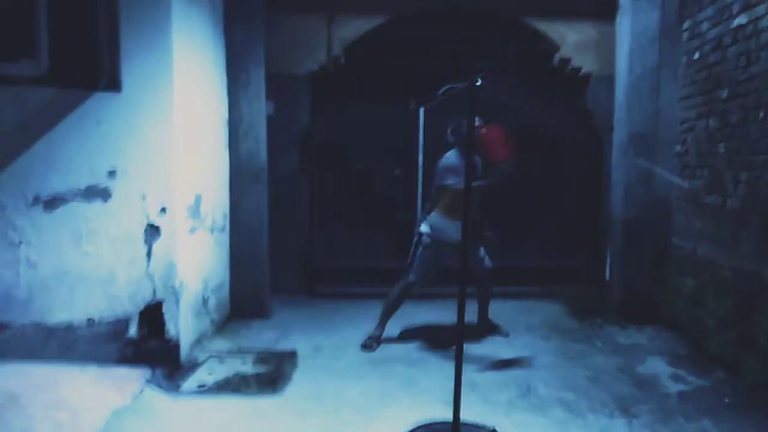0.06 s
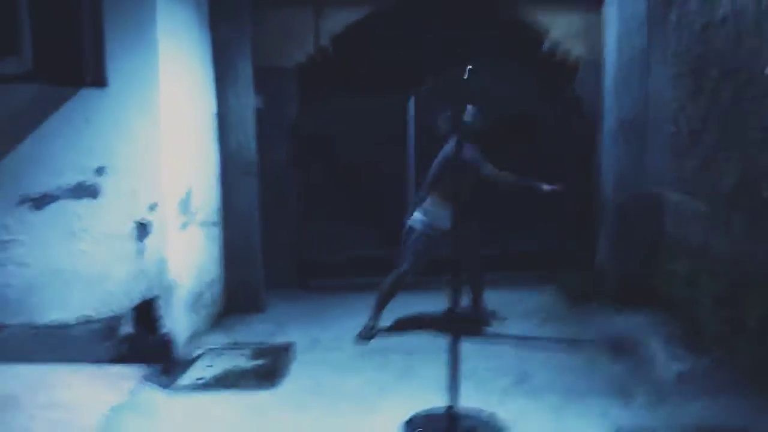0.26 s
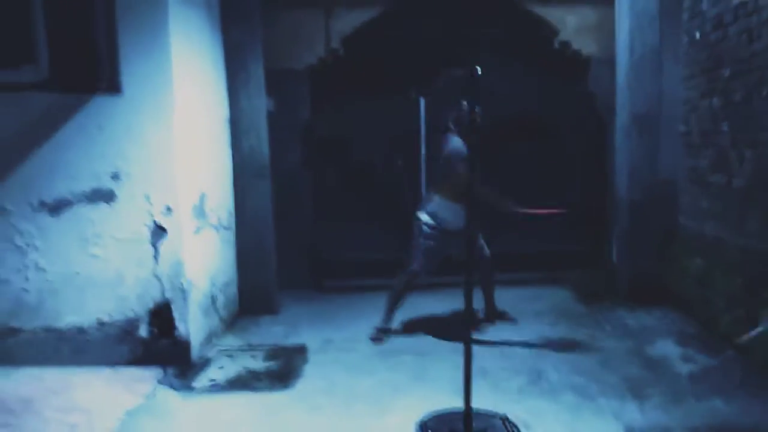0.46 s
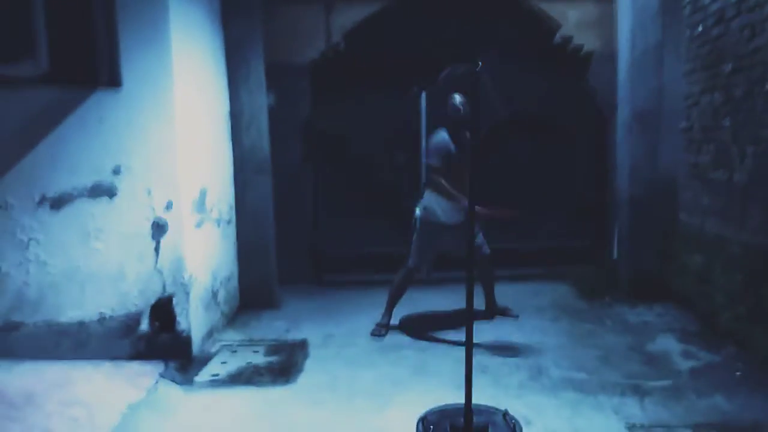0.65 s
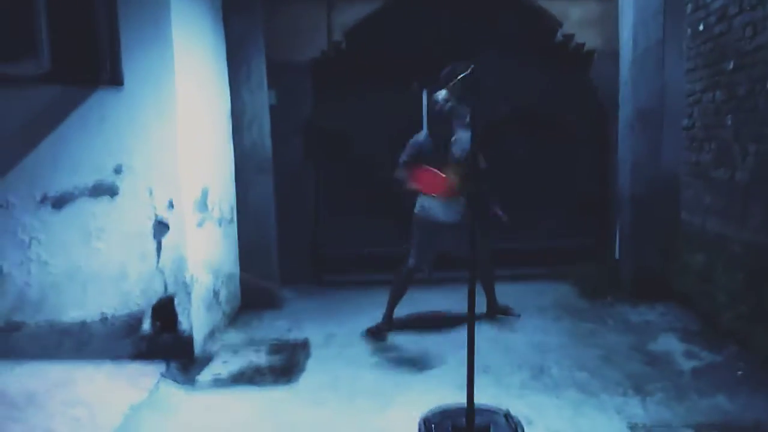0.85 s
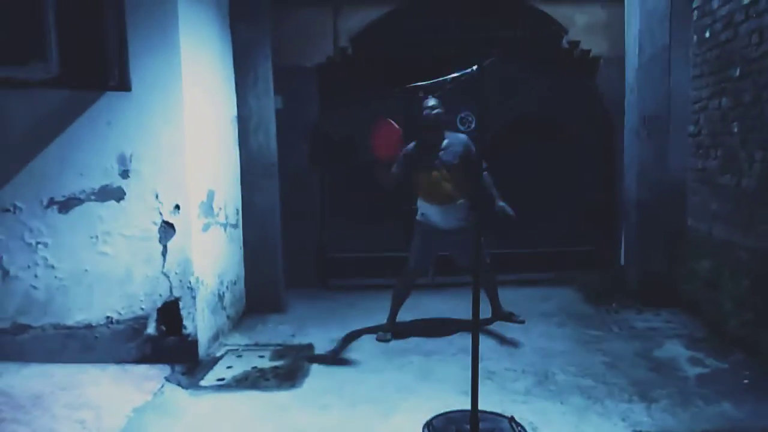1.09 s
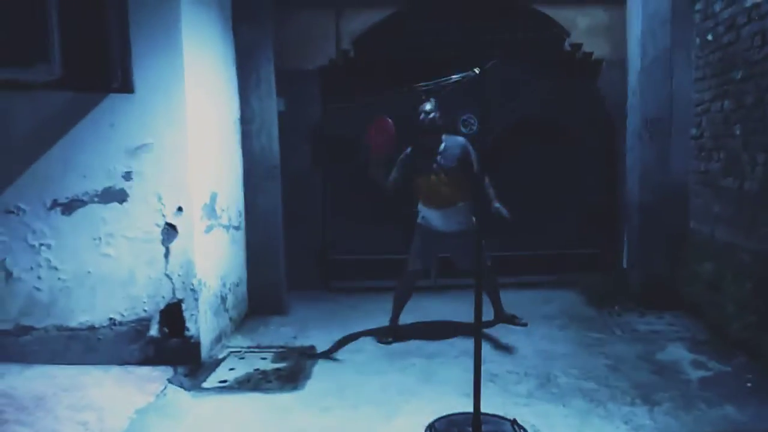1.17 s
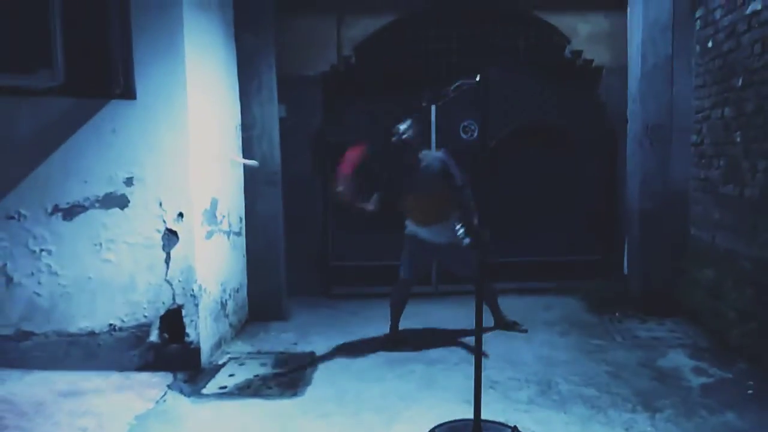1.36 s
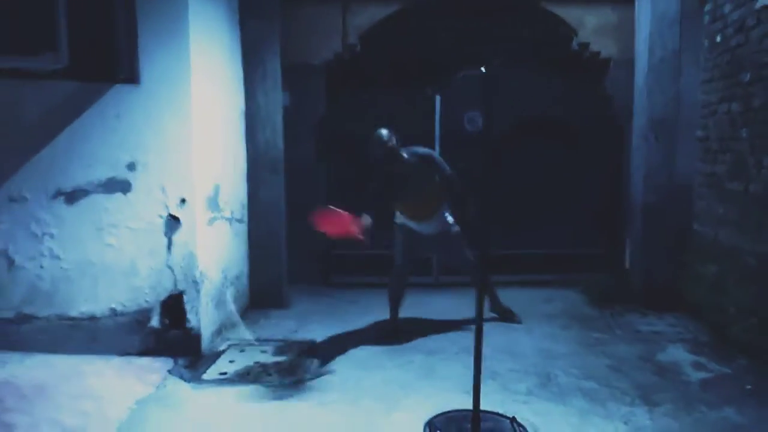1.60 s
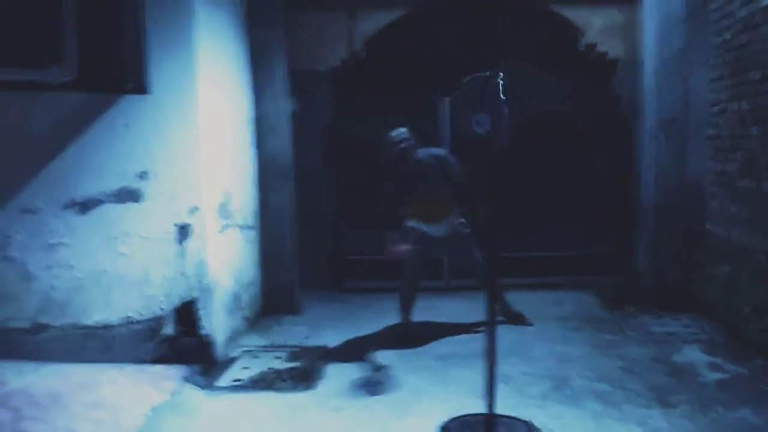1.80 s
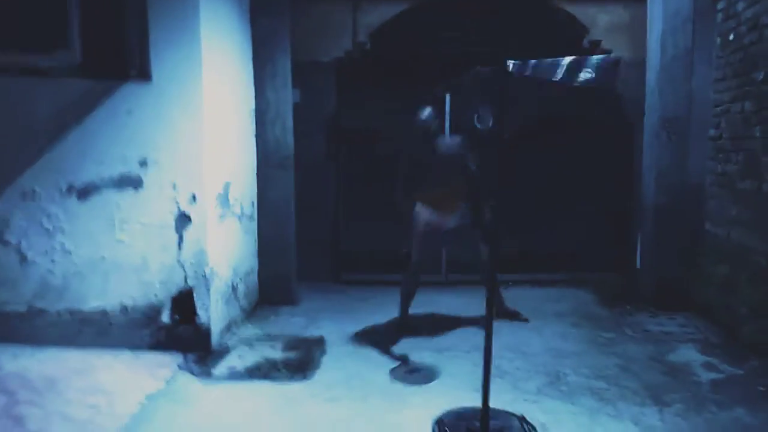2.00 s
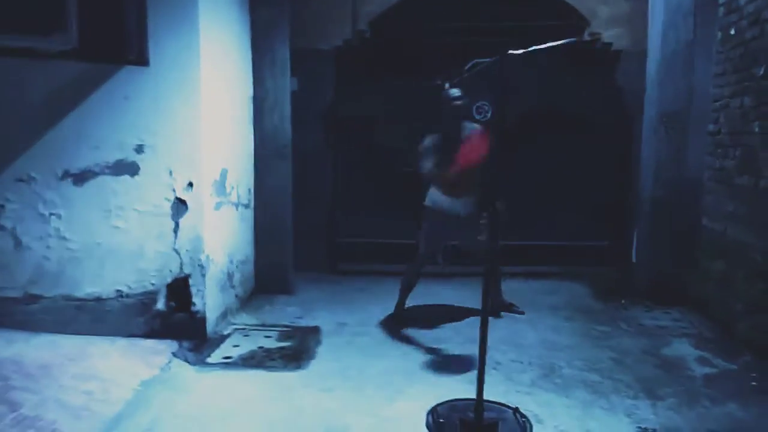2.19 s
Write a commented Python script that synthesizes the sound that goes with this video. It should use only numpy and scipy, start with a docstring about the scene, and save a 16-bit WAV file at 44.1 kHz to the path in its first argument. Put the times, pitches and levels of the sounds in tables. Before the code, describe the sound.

A paddle smashes a tethered ball with a booming thump, then hits it again with a brighter knock. The cord faintly swishes and squeaks, and an insect chirps rapidly throughout in a walled yard at night.

```python
"""Night in a walled yard: over low air, an insect rubs its wings in about twelve chirps a second.
A tether squeaks; at 0.22 s a paddle smashes the ball, the walls boom, and a thin tick follows.
The cord swishes and squeaks. At 1.44 s the right microphone, muffled throughout, takes a soft bump.
At 1.54 s comes a second, brighter knock, then more swish and squeak from the cord."""
import sys
import numpy as np
from scipy import signal
from scipy.fft import rfft, irfft
from scipy.io import wavfile

SR = 44100
rng = np.random.default_rng(int(sys.argv[2]) if len(sys.argv) > 2 else 0)


def output_pcm(signal):
    """Save a mono or channel-first signal as 16-bit PCM at the path in sys.argv[1].

    Samples are clipped to [-1, 1] before scaling.
    """
    pcm = np.clip(np.atleast_2d(signal).T, -1, 1) * 32767
    wavfile.write(sys.argv[1], SR, np.round(pcm).astype(np.int16))


N = 99225

# paddle blows: start_s, yard_db, build_s, hold_s, t60_scale, crack_db
BLOWS = [(.223, -18, 0.003, 0.066, 1.0, -25.5), (1.544, -21.5, .008, 0.019, 0.74, -23)]


def undb(db):
    """Decibels to gain."""
    return 10 ** (np.asarray(db) / 20)


def curve(points, hz):
    """Read (freq_hz, value) points on a log-frequency axis."""
    p = np.array(points, float)
    return np.interp(np.log(np.maximum(hz, 1)), np.log(p[:, 0]), p[:, 1])


def colour(x, points):
    """Filter by a (freq_hz, gain_db) curve."""
    size = 2 * N
    return irfft(rfft(x, size) * undb(curve(points, np.arange(N + 1) * SR / size)))[:N]


def noise(points):
    """Coloured noise, rms 1."""
    x = colour(rng.standard_normal(N), points)
    return x / x.std()


def swell(t, half_s):
    """Flat-topped burst centred on t = 0."""
    return np.exp(-np.square(np.square(t / half_s)))


def rise(t, length_s):
    """Linear onset from t = 0."""
    return np.clip(t / length_s, 0, 1)


def fade(t, t60_s):
    """Exponential decay from t = 0."""
    return np.exp(-np.log(1000) * np.maximum(t, 0) / t60_s)


def late_drop(t, knee_s=.3, db_per_s=105):
    """Extra decay past the knee."""
    return undb(-db_per_s * np.maximum(t - knee_s, 0))


def waver(t):
    """Slow random wobble, unit-variance knots."""
    knots_s = np.arange(0, 3, .02)
    return np.interp(t, knots_s, rng.standard_normal(len(knots_s)))


def scatter(x, t, t60_s):
    """Diffuse reflections: convolution with decaying noise of unit energy."""
    paths = rng.standard_normal(N) * fade(t, t60_s)
    return signal.fftconvolve(x, paths / np.linalg.norm(paths))[:N]


def night_air():
    """Steady low hush."""
    # air spectrum: freq_hz, density_db
    hush = [(60, -19), (170, -4), (290, 3), (550, -14.5), (900, -16.5), (2000, -22.5), (5000, -23),
            (9000, -26.5), (16000, -33)]
    return undb(-65.5) * noise(hush)


def night_rumble():
    """Left and right air rumble, mostly common to both."""
    # rumble spectrum: freq_hz, density_db
    rumble = [(20, -4.5), (50, -1), (100, 7.5), (170, -12), (300, -22), (700, -51.5), (2000, -37),
              (16000, -55)]
    common = noise(rumble)
    return [undb(-65.5) * (.85 * common + .5 * noise(rumble)) for _ in range(2)]


def insect(t):
    """Wings open softly and close loudly, each stroke sagging in pitch; the walls echo."""
    # chirps: centre_s, gain_db
    chirps = [(0.0306, 0.5), (0.1111, -3), (.1935, 0), (0.3484, -8), (0.4347, -1), (0.5227, -1), (.6095, 0),
              (.694, -1.5), (0.7787, 1), (0.8645, 0), (0.9454, -1), (1.0285, 3), (1.1105, 1.5), (1.1926, 2),
              (1.2735, 1.5), (1.3535, 0), (1.4333, 0), (1.5158, 0.5), (1.5972, -0.5), (1.684, -2),
              (1.7646, -0.5), (1.8471, 1), (1.9259, 0.5), (2.0115, -1), (2.0978, 0.5), (2.1812, 0.5),
              (2.266, 3)]
    # wing partials: pitch_hz, gain_db
    partials = [(571, -22), (1938, -32.5), (3327, -15.5), (4457, -26.5), (5803, -32.5), (7214, 0),
                (8333, -26.5), (9679, -32.5), (11100, -18), (12231, -28), (13566, -31), (14416, -26.5),
                (14987, -21.5)]
    # wall echoes: delay_s, gain_db
    echoes = [(.0065, -12), (.014, -17.5), (.0235, -13), (.033, -24.5)]
    # opening-wing scrape spectrum: freq_hz, density_db
    scrape_spectrum = [(7000, -33), (9000, -38.5), (9900, 11), (12000, -29.5), (13000, -30.5), (13700, 17),
                       (14600, -23), (15600, -9)]
    half_s, open_lead_s, scrape_lead_s = .0039, .016, .018
    open_sag_hz_per_s, close_sag_hz_per_s = 45000, 30000
    wings, close_env, open_env, scrape_env = np.zeros((4, N))
    for (at_s, db), draw in zip(chirps, rng.standard_normal((len(chirps), 4))):
        detune_hz, width_s = 25 * draw[0], half_s * (1 + .14 * draw[1])
        opening = (-open_lead_s + .0015 * draw[2], -17.5 + 1.5 * draw[3], open_sag_hz_per_s)
        parts = [(0, 0, close_sag_hz_per_s), opening]
        parts += [(s, g + 2.5 * rng.standard_normal(), close_sag_hz_per_s) for s, g in echoes]
        for delay_s, part_db, sag in parts:
            near = abs(t - at_s - delay_s) < 2 * half_s
            u = t[near] - at_s - delay_s
            slip = .6 * np.cumsum(rng.standard_normal(len(u))) / SR ** .5  # uneven teeth
            bend_cycles = detune_hz * u - sag * u * u / 2 + slip
            tone = sum(undb(g) * np.sin(2 * np.pi * (hz * u + bend_cycles + rng.random()))
                       for hz, g in partials)
            wings[near] += undb(db + part_db) * swell(u, width_s) * tone
        close_env += undb(db) * swell(t - at_s, half_s)
        open_env += undb(db) * swell(t - at_s + open_lead_s, half_s)
        scrape_env += undb(db) * swell(t - at_s + scrape_lead_s, half_s=.011)
    close_rasp = undb(-29.5) * close_env * rng.standard_normal(N)
    open_rasp = undb(-25) * open_env * noise([(6200, -32), (7200, -2), (8300, -39)])
    wings += close_rasp + open_rasp
    tail = undb(-15) * scatter(wings, t, t60_s=.21)
    return undb(-32.5) * (wings + tail) + undb(-64) * scrape_env * noise(scrape_spectrum)


def cord(t):
    """The cord squeaks faintly on the pole and hisses through the air."""
    # squeaks: centre_s, half_s, pitch_hz, level_db
    squeaks = [(0.045, 0.0468, 2850, -67.5), (1.3, 0.014, 2100, -65), (1.81, .025, 2590, -62.5),
               (1.865, 0.026, 2530, -61.5), (1.843, 0.063, 3020, -65.5)]
    # swishes: centre_s, half_s, level_db
    swishes = [(0.983, 0.0467, -51.5), (1.773, 0.12, -53)]
    # swish spectrum: freq_hz, density_db
    swish_spectrum = [(300, -23), (1500, -11), (3000, -13.5), (5500, -4), (7000, -7.5), (9000, 5.5),
                      (12000, -2), (14500, 1.5), (16000, -22)]
    out = noise(swish_spectrum) * sum(undb(db) * swell(t - at_s, half_s) for at_s, half_s, db in swishes)
    for at_s, half_s, hz, db in squeaks:
        envelope = undb(db + 3.2 * waver(t)) * swell(t - at_s, half_s)
        out += envelope * noise([(hz * .795, -60), (hz, 0), (hz * 1.107, -60)])
    return out


def paddle_ring(age_s):
    """Struck paddle modes, wavering in level and phase."""
    # paddle modes: pitch_hz, gain_db, base_t60_s
    modes = [(354.8, -12, 0.71), (511, -14.5, 0.28), (670, -10.5, 0.33), (761.8, -0.5, .25),
             (987, -14.5, 0.28), (1145, -2.5, 0.61), (1234, -3, 0.25), (1283, -1, .58), (1388, -6.5, .42),
             (1795, -20, 0.3), (2020, -16, 0.36), (2580, -17, 0.43)]
    ring = 0
    for hz, db, t60_s in modes:
        envelope = undb(db) * fade(age_s, t60_s) * (1 + .3 * waver(age_s - age_s[0]))
        phase = 2 * np.pi * (hz * age_s + rng.random()) + .6 * waver(age_s - age_s[0])
        ring += envelope * np.sin(phase)
    return undb(-27.5) * ring * rise(age_s, .0064) * late_drop(age_s)


def yard(age_s, spectrum, build_s, hold_s, t60_scale):
    """Dense reflections build, hold, then die by octave band; the treble holds least."""
    # yard ring time: freq_hz, base_t60_s
    ring_times = [(50, 1), (130, 0.8146), (300, 0.51), (700, 0.45), (1250, 0.51), (3000, 0.62),
                  (9000, 0.54), (15000, 0.45)]
    bins, hz = rfft(noise(spectrum)), np.arange(N // 2 + 1) * SR / N
    octave = np.clip(np.log2(np.maximum(hz, 1) / 32), 0, 9)
    out = 0
    for k in range(10):
        centre_hz = 32 * 2 ** k
        band = irfft(bins * np.maximum(1 - abs(octave - k), 0), N)
        onset = rise(age_s, build_s + 3.3 / centre_hz) ** (2 if k < 4 else 1)
        decay = fade(age_s - hold_s / (1 + centre_hz / 3500), t60_scale * curve(ring_times, centre_hz))
        out += band * onset * decay * (late_drop(age_s) if k > 2 else 1)
    return out


def blows(t):
    """Each blow rings the paddle, cracks and fills the yard."""
    # smash spectrum in the yard: freq_hz, density_db
    smash = [(25, -14), (60, -8), (105, -5), (160, -3.5), (250, -6), (500, -9.5), (800, -11.5), (1220, -11),
             (1700, -18), (3000, -25.5), (5500, -28), (7000, -29), (8300, -26), (12000, -34.5),
             (16000, -44)]
    # knock spectrum in the yard: freq_hz, density_db
    knock = [(40, -30), (100, -13.5), (170, -5), (250, -5), (370, -0.5), (640, -3.5), (860, -8.5),
             (1200, 5), (1650, -10), (3000, -20), (5500, -23), (8500, -18), (12000, -26.5), (16000, -33.5)]
    # crack spectrum: freq_hz, density_db
    crack_spectrum = [(200, -12.5), (1200, 13), (2500, 0), (6000, -10.5), (8500, -3), (16000, -20)]
    out = 0
    for (at_s, yard_db, build_s, hold_s, t60_scale, crack_db), spectrum in zip(BLOWS, (smash, knock)):
        age_s = t - at_s
        out += paddle_ring(age_s)
        crack = noise(crack_spectrum) * rise(age_s, .003) * np.exp(-np.maximum(age_s, 0) / .02)
        out += undb(crack_db) * crack
        out += undb(yard_db) * yard(age_s, spectrum, build_s, hold_s, t60_scale)
    return out


def wall_slaps(t):
    """The walls return each blow as short, sharp pulses."""
    # slaps: centre_s, level_db, pitch_hz, half_s
    slaps = [(.229, -17, 1252, .002), (.2345, -20, 1200, 0.007), (0.233, -19, 400, .006),
             (.243, -17.5, 1200, 0.0027), (.251, -8, 520, 0.003), (.2555, -12.5, 165, 0.0072),
             (.296, -19.5, 330, 0.011), (.305, -18.5, 175, 0.01), (.345, -26, 149, 0.0044),
             (1.548, -23.5, 486, .007), (1.55, -29, 1150, 0.0085), (1.5635, -9, 1200, 0.0012),
             (1.571, -17, 1231, 0.012), (1.587, -20.5, 1220, 0.0035)]
    return sum(undb(db) * np.exp(-np.square((t - at_s) / half_s)) * np.sin(2 * np.pi * hz * (t - at_s))
               for at_s, db, hz, half_s in slaps)


def boom(t, lag_s=.022):
    """Low standing waves between the walls, raised by the smash."""
    # standing waves: pitch_hz, level_db, base_t60_s
    modes = [(124, -30.5, 0.97), (166.7, -23.5, .6), (203.1, -38.5, .75)]
    age_s = t - BLOWS[0][0] - lag_s
    waves = sum(undb(db) * fade(age_s, t60_s) * np.sin(2 * np.pi * (hz * age_s + rng.random()))
                for hz, db, t60_s in modes)
    return waves * rise(age_s, .0092) * late_drop(age_s, knee_s=.43)


def tick(t, start_s=.4071):
    """A thin, high tick rings briefly in the yard."""
    # tick spectrum: freq_hz, density_db
    spectrum = [(3000, -30), (7000, -16.5), (8500, 9.5), (12000, -1), (16000, -7)]
    return undb(-40) * noise(spectrum) * fade(t - start_s, t60_s=.239) * (t > start_s)


def bump(t):
    """A dull push on the microphone, then a short rumble."""
    # pushes: centre_s, gain_db, pitch_hz
    pushes = [(1.4384, -28.5, 107.8), (1.4509, -15.5, 95.2)]
    # push filter: freq_hz, gain_db
    body = [(100, -1), (400, 10), (900, 4.5), (1400, -10), (3000, -50.5)]
    # rumble spectrum: freq_hz, density_db
    tail_spectrum = [(25, -19.5), (70, -13), (120, -2), (220, -20), (500, -31.5), (1500, -66.5)]
    push_tau_s, tail_tau_s = .0035, .079
    push = sum(undb(db) * np.exp(-abs(t - at_s) / push_tau_s) * np.cos(2 * np.pi * hz * (t - at_s))
               for at_s, db, hz in pushes)
    age_s = t - pushes[-1][0]
    tail = undb(-38) * noise(tail_spectrum) * rise(age_s, .0044) * np.exp(-abs(age_s) / tail_tau_s)
    return colour(push, body) + tail


def muffled_mic(sound, t):
    """The right microphone gets extra reflections, loses treble and hisses faintly."""
    # microphone response: freq_hz, gain_db
    muffle = [(50, -7), (110, -10), (200, -15.5), (380, -21), (700, -22), (1290, -33), (2380, -40.5),
              (4400, -38.5), (8000, -56), (15000, -32)]
    reflections = undb(-4.5) * colour(scatter(sound, t, t60_s=.15), [(120, -7.5), (500, -7)])
    hiss = undb(-94.5) * noise([(500, 3.5), (16000, -13.5)])
    return colour(sound + reflections, muffle) + hiss


def scene():
    """The yard at the open left and muffled right microphones."""
    t = np.arange(N) / SR
    sound = blows(t) + wall_slaps(t) + boom(t) + tick(t) + insect(t) + cord(t) + night_air()
    rumble_left, rumble_right = night_rumble()
    return np.array([sound + rumble_left, muffled_mic(sound, t) + rumble_right + bump(t)])


def record(dry):
    """Steep low-pass at 16.3 kHz."""
    return signal.sosfilt(signal.ellip(8, .2, 70, 16300, fs=SR, output="sos"), dry)


dry = scene()
out = record(dry)
output_pcm(out)
```